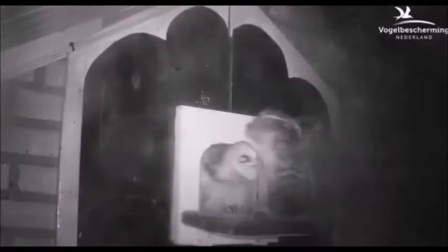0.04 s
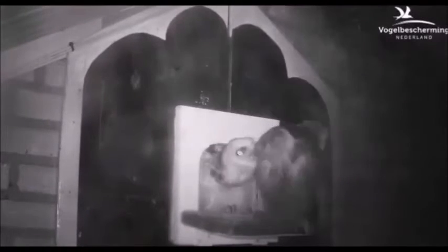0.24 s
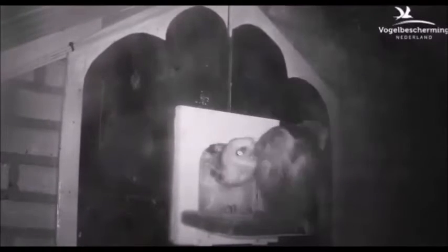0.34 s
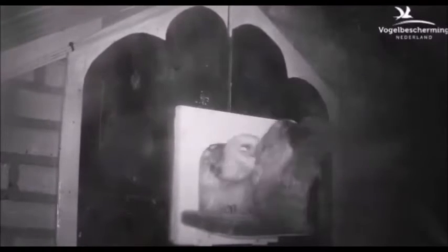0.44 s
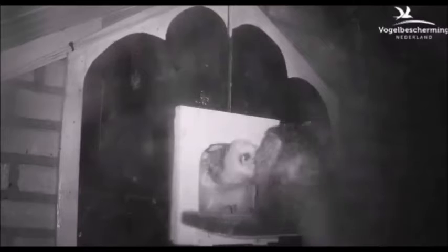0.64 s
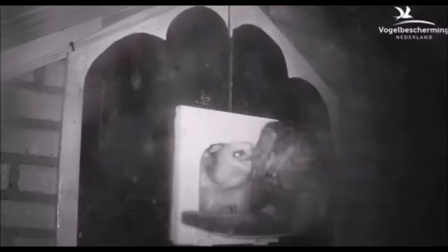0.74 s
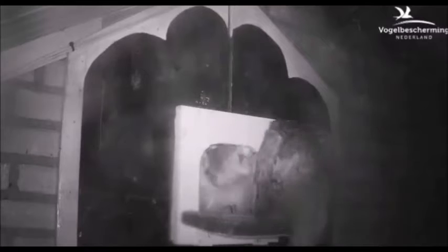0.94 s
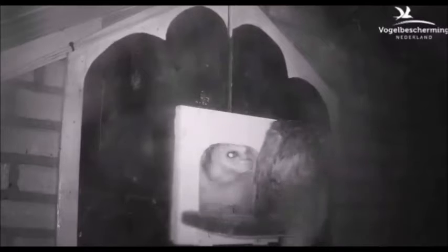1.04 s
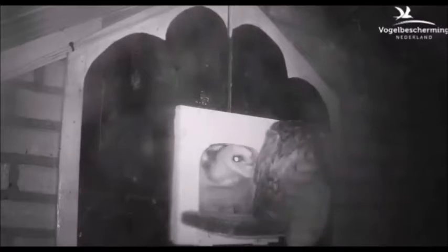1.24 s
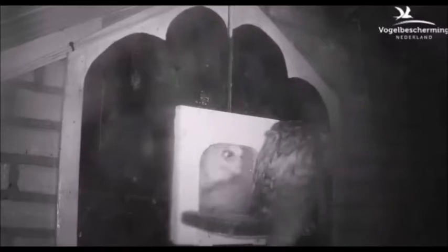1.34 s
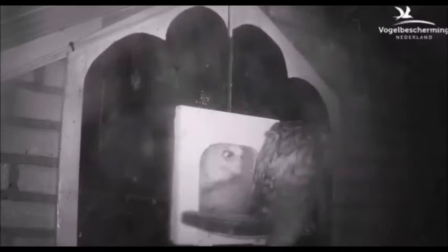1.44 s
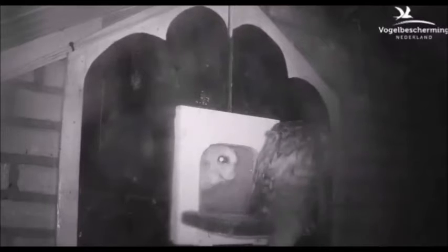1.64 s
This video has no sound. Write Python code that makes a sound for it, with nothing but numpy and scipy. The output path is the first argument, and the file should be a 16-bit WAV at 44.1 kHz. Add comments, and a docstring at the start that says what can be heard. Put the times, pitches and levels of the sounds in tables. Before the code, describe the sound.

A barn owl gives one long, harsh hiss in a wooden nest box. It starts at about 0.1 seconds after a soft bump, swells to a peak near 1 second, where the microphone clicks sharply, then eases and trails off around 1.5 seconds. Shuffling birds knock softly on the boards, mostly between 0.3 and 0.7 seconds and again near the end. A faint low drone runs underneath.

```python
"""A soft bump on wood and a faint hiss come first, then a barn owl's long, harsh hiss fills its nest box.
Air rushing through the owl's ringing throat makes the hiss, which swells, eases and leaves a faint tail.
Shuffling birds knock on the boards over a low drone. The microphone is mono and narrow;
at the height of the call the level drops out for an instant, with a click at each edge."""
import sys
import numpy as np
from scipy.fft import rfft, irfft, next_fast_len
from scipy.io import wavfile
from scipy.ndimage import uniform_filter1d, map_coordinates

SR = 44100
rng = np.random.default_rng(int(sys.argv[2]) if len(sys.argv) > 2 else 0)


def log_audio(samples):
    """Write samples as a 16-bit WAV file to the path given in sys.argv[1]."""
    # one column per channel
    frames = np.atleast_2d(samples).T
    # limit to full scale, then quantise
    limited = np.clip(frames, -1, 1)
    pcm = np.round(limited * 32767).astype(np.int16)
    wavfile.write(sys.argv[1], SR, pcm)


N = 74970

# How hard the owl blows. Each row: time in seconds, effort in dB.
EFFORT = [(.1, -63.5), (.132, -40.5), (.21, -32), (.29, -30.5), (.385, -27), (.455, -27), (.54, -23.5),
          (.63, -24), (.72, -20.5), (.79, -21), (.9, -18), (.99, -18), (1.1, -18.5), (1.2, -19.5),
          (1.3, -22.5), (1.41, -22), (1.49, -26), (1.535, -58), (1.6, -81)]
# Tone colours of the call. Each row: frequency in Hz, relative strength in dB.
THROAT_OPENING = [(1950, -54), (2200, -35), (2400, -20.5), (2600, -13), (2800, -2), (3020, -6), (3200, 1.5),
                  (3420, -0.5), (3720, 0.5), (3980, -12.5), (4250, -16.5), (4450, -32), (4620, -46.5)]
THROAT_FULL = [(1950, -58), (2200, -35), (2400, -25), (2600, -13.5), (2780, -4), (3020, 5), (3220, -1),
               (3420, 2.5), (3720, -3), (3980, -11), (4250, -19.5), (4450, -31.5), (4620, -54.5)]
THROAT_CLOSING = [(1950, -45), (2200, -31.5), (2400, -18), (2600, -7.5), (2760, 2), (3020, -8.5),
                  (3220, -6.5), (3450, 4.5), (3720, 1.5), (3980, -7.5), (4250, -11.5), (4450, -31),
                  (4620, -55.5)]
RUSH_COLOUR = [(250, -4), (330, -4), (420, 1), (520, 3.5), (700, -0.5), (900, 2.5), (1130, 2), (1380, -4),
               (1550, -14.5), (1950, -19.5)]
RUMBLE_COLOUR = [(15, -6.5), (35, -2), (120, 0.5), (300, 0.5), (500, -20.5)]
# The throat's gliding whistle. Each row: time in seconds, pitch in Hz.
WHISTLE_PITCH = [(.2, 3418), (.4, 3448), (.5, 3430), (.55, 3304), (.67, 3432), (1.0, 3424), (1.25, 3475),
                 (1.5, 3530)]
# Steady pitches that ring in the throat. Each row: pitch in Hz, width in Hz, dB added to the effort.
THROAT_RINGS = [(2678, 18, -22), (2807, 18, -18), (3056, 30, -12), (3324, 22, -14), (3699, 22, -14),
                (3953, 20, -24), (4171, 35, -27)]

# The weak hiss before (lead) and after (trail) the call. Each row: time in seconds, level in dB.
LEAD_LEVEL = [(0, -54), (.07, -49.5), (.13, -49), (.25, -77.5)]
TRAIL_LEVEL = [(1.4, -77), (1.5, -33), (1.55, -44), (1.61, -51), (1.65, -62.5), (1.7, -87)]
# Their tone colours. Each row: frequency in Hz, relative strength in dB.
LEAD_COLOUR = [(1950, -33), (2300, -20), (2550, -19.5), (2850, -1.5), (3100, 3), (3550, 0.5), (3750, -14),
               (4000, -25), (4300, -27.5), (4550, -40)]
TRAIL_COLOUR = [(1950, -37.5), (2150, -19), (2350, -5), (2650, 5), (3100, -3.5), (3520, 8), (3750, -2.5),
                (4100, -10), (4300, -23), (4550, -38)]

# Bumps on the boards. Each row: time in seconds, level in dB, half-length in seconds, pitch in Hz.
BUMPS = [(0.025, -36, 0.0039, 254.5), (0.103, -41, 0.0053, 240.7), (0.302, -31, 0.0075, 225),
         (0.315, -32, 0.0083, 215), (.335, -29, 0.0027, 240), (0.384, -40.5, 0.0027, 250.8),
         (0.477, -33.5, 0.0069, 271.3), (0.496, -28, .0045, 209), (0.549, -37, 0.0084, 219),
         (0.616, -27, 0.0058, 228), (0.653, -38.5, 0.0064, 244.9), (0.671, -43.5, 0.0094, 128.3),
         (0.902, -32.5, 0.0033, 220), (0.958, -33.5, 0.0034, 230.7), (1.497, -33.5, 0.0054, 212),
         (1.587, -47, 0.0035, 696), (1.692, -37, 0.0049, 204.2)]
# The box's own notes. Each row: pitch in Hz, dB added to the bump, seconds to fade by 60 dB.
BOX_NOTES = [(229, -13.5, 0.11), (282.6, -17.5, 0.071), (502, -25, 0.047)]
# Tone colours of rubbing on wood. Each row: frequency in Hz, relative strength in dB.
SCUFF_COLOUR = [(60, -17.5), (170, -1), (300, 0.5), (420, -5.5), (560, -4), (750, -20), (1500, -49)]
SCRAPE_COLOUR = [(80, -12.5), (200, 10), (350, -2), (600, -7.5), (800, -16.5), (1000, -7), (2000, -53.5)]
# Pitches that ring in the scrape. Each row: pitch in Hz, width in Hz, relative level in dB.
SCRAPE_RINGS = [(520, 56, -1), (714, 30, -2.5)]

# Tone colours of the drone, airy noise and fizz. Each row: frequency in Hz, relative strength in dB.
DRONE_COLOUR = [(20, -31.5), (50, -27.5), (80, -10.5), (110, -24), (160, -8), (205, 0.5), (270, -3.5),
                (350, -12.5), (500, -29)]
AIR_COLOUR = [(300, -6), (430, -14), (520, 7), (700, -6.5), (930, -11), (1130, 0), (1400, -7.5),
              (1700, -17), (1950, -32.5), (3500, -36.5), (4800, -57.5), (15000, -53)]
FIZZ_COLOUR = [(3500, 1), (4800, 3.5), (6500, -10.5), (11000, -20.5), (15500, -29.5)]
# Pitches that ring in the drone. Each row: pitch in Hz, width in Hz, level in dB.
DRONE_RINGS = [(235.4, 14, -57.5), (275.7, 8.7, -55.5)]
# The airy noise, fading at the end. Each row: time in seconds, level in dB.
AIR_LEVEL = [(0, -61.5), (.12, -56), (.3, -52.5), (.5, -51), (.75, -56), (1.3, -53), (1.53, -53),
             (1.62, -69.5), (1.7, -70.5)]

OPENING_S, FULL_S, CLOSING_S = 0.32, 0.92, 1.37  # when each throat colour is heard alone
RASP_DB, RASP_PER_S = 0.6, 130  # flutter of the air stream
RUSH_DB, RUSH_GROWS = -25.5, 2.24  # level against peak effort; dB gained per dB of effort
OVERTONES_HZ, OVERTONE_DB = (7130, 7780, 8450), -74.5  # level against the effort
BUMP_SCATTER_DB, BOX_ATTACK_S = 2, 0.0031
DROP_START_S, DROP_END_S, DROP_DB = 1.01, 1.013, -16
CLICK_HZ, CLICK_WIDTH_HZ = 4700, 2500
FIZZ_DB, FIZZ_FADE_S = -47.5, 0.27  # starting level; time to fade by 60 dB
TOP_HZ = 15750


def owl_hiss():
    """Blowing harder lifts the rasping throat noise, its ringing pitches and a low rush of air."""
    t, effort_db = clock(), curve(EFFORT)
    peak_db = effort_db.max()
    from_peak_db = effort_db - peak_db
    # The throat blends from one colour into the next.
    opening = np.interp(t, [OPENING_S, FULL_S], [1, 0])
    closing = np.interp(t, [FULL_S, CLOSING_S], [0, 1])
    full = np.abs(1 - opening - closing)
    blend = (opening, THROAT_OPENING), (full, THROAT_FULL), (closing, THROAT_CLOSING)
    breath = sum(np.sqrt(share) * throat_noise(colour) for share, colour in blend)
    rings = ringing(THROAT_RINGS)
    whistle_db = -8 + np.minimum(-0.2 * from_peak_db, 4)  # stands out most at low effort
    whistle = amp(whistle_db) * narrow_noise(curve(WHISTLE_PITCH), width_hz=36)
    rasp_db = RASP_DB * wobble(RASP_PER_S)
    rush_db = peak_db + RUSH_DB + RUSH_GROWS * from_peak_db
    rush = amp(rush_db + rasp_db) * noise(RUSH_COLOUR)
    rumble = amp(-49) * swell(at_s=1.04, width_s=0.061) * noise(RUMBLE_COLOUR)
    overtones = amp(OVERTONE_DB) * sum(narrow_noise(hz, width_hz=70) for hz in OVERTONES_HZ)
    voice = amp(-2) * breath + rings + whistle + overtones
    return amp(effort_db + rasp_db) * voice + rush + rumble


def throat_noise(colour):
    """Swirling air, kept to the throat's range of 1850 to 4640 Hz."""
    return unit(filtered(noise(colour), lambda hz: (hz > 1850) & (hz < 4640)))


def weak_hiss():
    """A quiet, narrow hiss leads into the call and a broader one trails away after it."""
    lead = amp(curve(LEAD_LEVEL)) * throat_noise(LEAD_COLOUR)
    trail = amp(curve(TRAIL_LEVEL)) * throat_noise(TRAIL_COLOUR)
    return lead + trail


def shuffling():
    """Feet and wings thud, scuff and scrape; the box rings and a wall booms under a bird's weight."""
    t, bumps = clock(), np.zeros(N)
    for at_s, db, half_s, hz in BUMPS:
        age = np.maximum(t - at_s, 0)
        thud = swell(at_s, half_s) * np.sin(2 * np.pi * (hz * t + rng.random()))
        ring = np.zeros(N)
        for note_hz, note_db, fade_s in BOX_NOTES:
            ring_db = note_db + rng.normal(0, BUMP_SCATTER_DB) - 60 * age / fade_s
            ring += amp(ring_db) * np.sin(2 * np.pi * note_hz * age)
        attack = 1 - np.exp(-age / BOX_ATTACK_S)
        bumps += amp(db) * (thud + attack * ring)
    contact_power = sum((amp(db) * swell(at_s, width_s=0.012)) ** 2 for at_s, db, _, _ in BUMPS)
    scuffs = amp(-15) * np.sqrt(contact_power) * noise(SCUFF_COLOUR)
    boom = amp(-43.5) * swell(at_s=0.357, width_s=0.056) * np.sin(2 * np.pi * 78.5 * t)
    rubbing = noise(SCRAPE_COLOUR) + ringing(SCRAPE_RINGS)
    scrape = amp(-48) * swell(at_s=1.587, width_s=0.028) * rubbing
    return bumps + scuffs + boom + scrape


def background():
    """A low, wavering drone coloured by the box, and airy noise with one ringing pitch."""
    drone_db = -52.5 + 2.5 * wobble(per_s=7.3)
    drone = amp(drone_db) * noise(DRONE_COLOUR) + ringing(DRONE_RINGS)
    air = noise(AIR_COLOUR) + amp(-9.5) * narrow_noise(hz=1108, width_hz=13)
    return drone + amp(curve(AIR_LEVEL)) * air


def amp(db):
    """Turns decibels into a number to multiply by."""
    return 10 ** (np.asarray(db) / 20)


def unit(x):
    """Scales a sound to an average (rms) level of 1."""
    return x / np.sqrt(np.mean(x ** 2) + 1e-20)


def clock():
    """The time of each sample in seconds."""
    return np.arange(N) / SR


def curve(rows):
    """Joins (seconds, value) points with straight lines."""
    return np.interp(clock(), *np.transpose(rows))


def swell(at_s, width_s):
    """A bell-shaped rise and fall."""
    return np.exp(-((clock() - at_s) / width_s) ** 2 / 2)


def wobble(per_s):
    """A smooth curve through per_s random values a second."""
    return map_coordinates(rng.standard_normal(N // 8), [clock() * per_s], mode="wrap")


def filtered(x, response):
    """Multiplies each frequency in x by response(hz)."""
    size = next_fast_len(N + SR // 4)
    return irfft(rfft(x, size) * response(np.fft.rfftfreq(size, 1 / SR)), size)[:N]


def noise(colour):
    """Noise of level 1 with the given tone colour, silent above its last row."""
    row_hz, row_db = np.transpose(colour)

    def response(hz):
        return amp(np.interp(np.log(hz + 1), np.log(row_hz), row_db, right=-np.inf))
    return unit(filtered(rng.standard_normal(N), response))


def narrow_noise(hz, width_hz):
    """Noise of level 1 ringing around one pitch, which may move."""
    phase = 2 * np.pi * np.cumsum(hz * np.ones(N)) / SR
    return unit(wobble(2 * width_hz) * np.cos(phase) + wobble(2 * width_hz) * np.sin(phase))


def ringing(rows):
    """Several narrow noises added together."""
    return sum(amp(db) * narrow_noise(hz, width_hz) for hz, width_hz, db in rows)


def scene():
    """Everything reaches one microphone, so both channels match."""
    return np.tile(owl_hiss() + weak_hiss() + shuffling() + background(), (2, 1))


def record(dry):
    """The level drops briefly between two clicks, a fizz trails off, and nothing passes above TOP_HZ."""
    t = clock()
    dropped = (t > DROP_START_S) & (t < DROP_END_S)
    gain = uniform_filter1d(np.where(dropped, amp(DROP_DB), 1.), size=8)
    edges = np.zeros(N)
    edges[round(DROP_START_S * SR)] = -1
    edges[round(DROP_END_S * SR)] = 1

    def click_colour(hz):
        damping = 1j * hz * CLICK_WIDTH_HZ
        return damping / (CLICK_HZ ** 2 - hz ** 2 + damping)
    clicks = amp(-14.5) * filtered(edges, click_colour)
    fizz_db = FIZZ_DB - 60 * np.abs(t - DROP_END_S) / FIZZ_FADE_S
    fizz = (t > DROP_START_S) * amp(fizz_db) * noise(FIZZ_COLOUR)
    return np.array([filtered(x * gain + clicks + fizz, lambda hz: hz < TOP_HZ) for x in dry])


dry = scene()
out = record(dry)
log_audio(out)
```